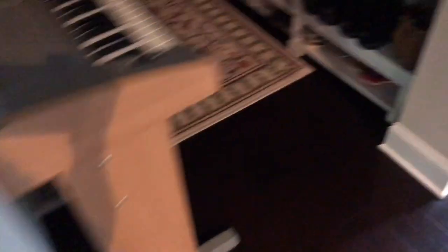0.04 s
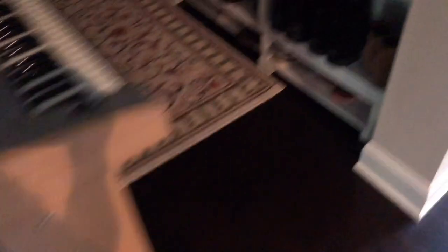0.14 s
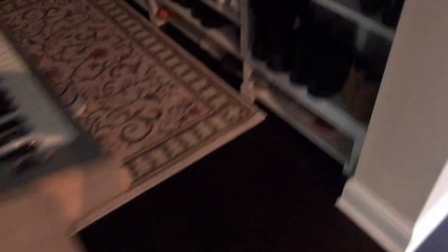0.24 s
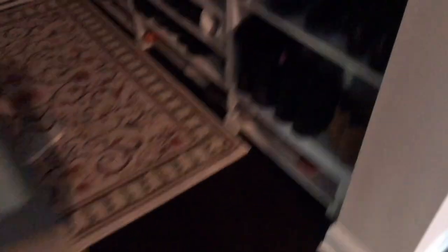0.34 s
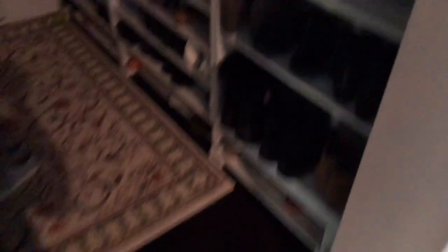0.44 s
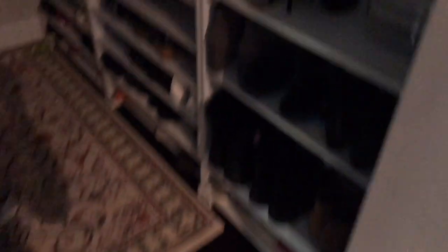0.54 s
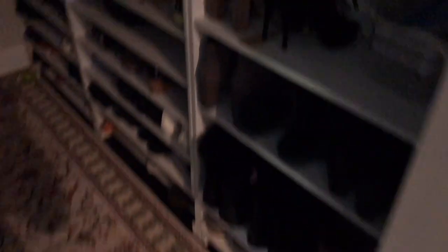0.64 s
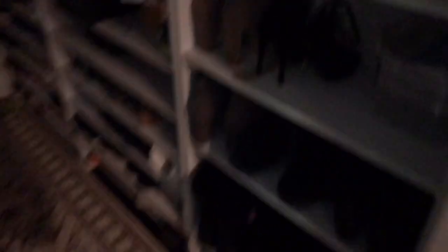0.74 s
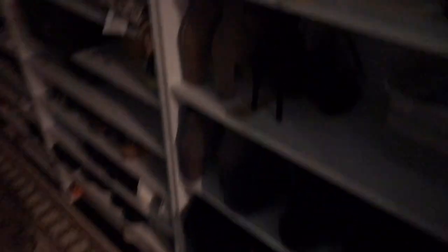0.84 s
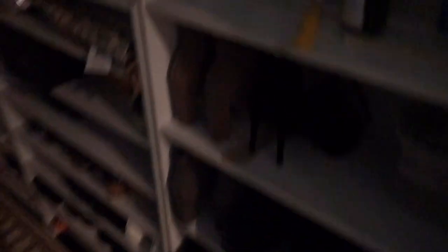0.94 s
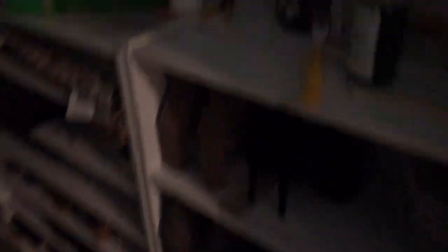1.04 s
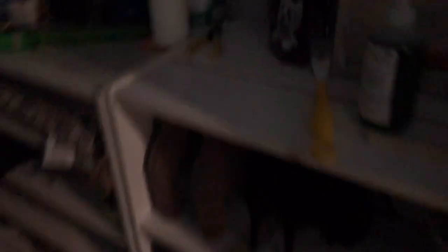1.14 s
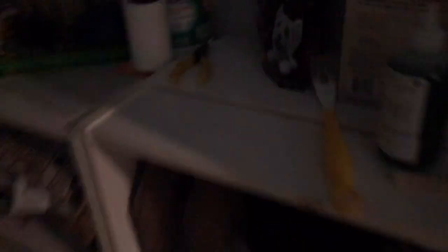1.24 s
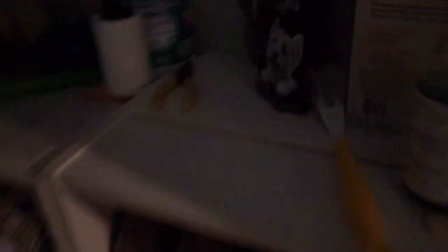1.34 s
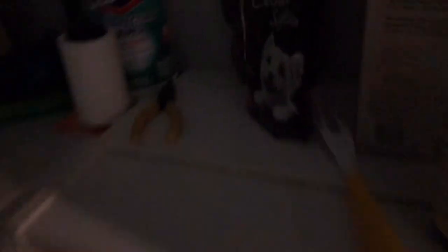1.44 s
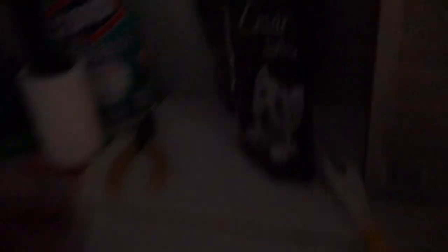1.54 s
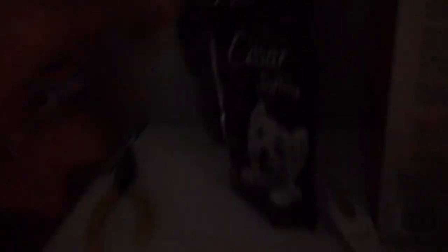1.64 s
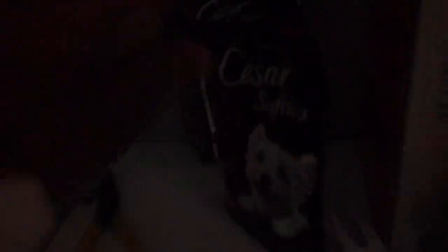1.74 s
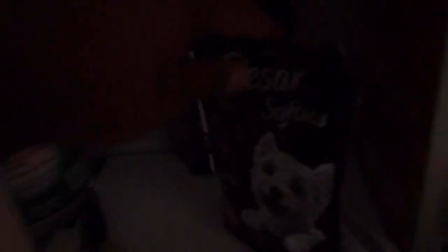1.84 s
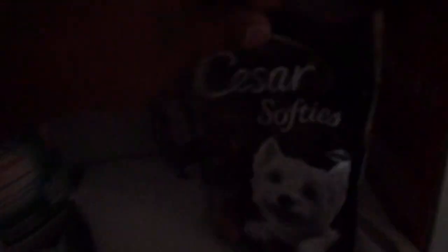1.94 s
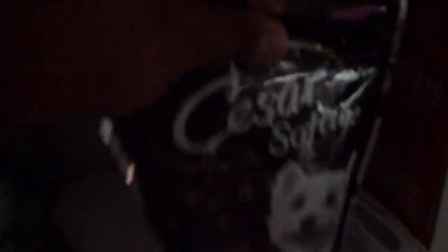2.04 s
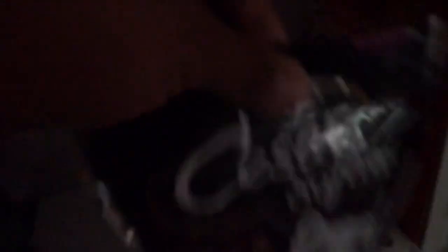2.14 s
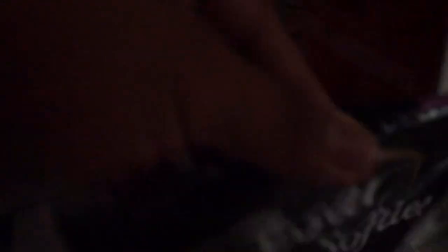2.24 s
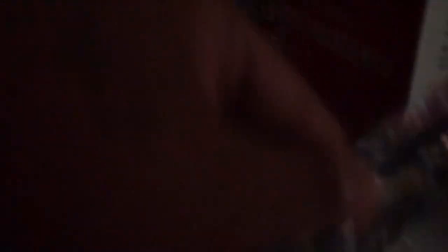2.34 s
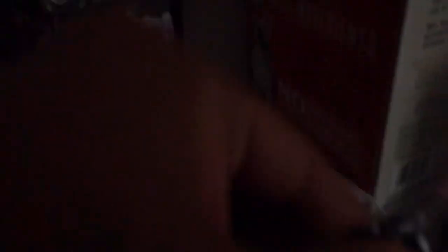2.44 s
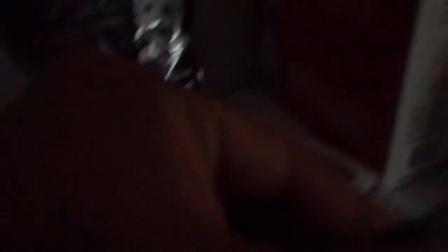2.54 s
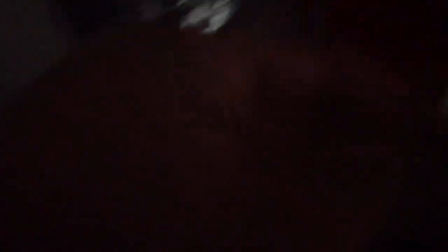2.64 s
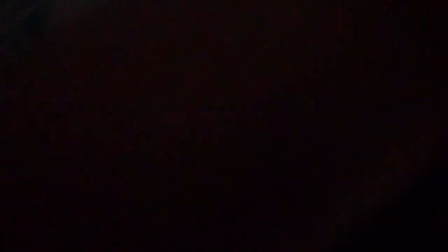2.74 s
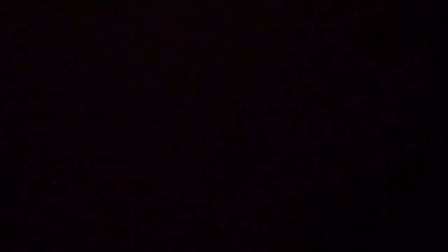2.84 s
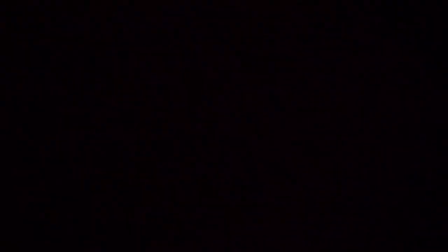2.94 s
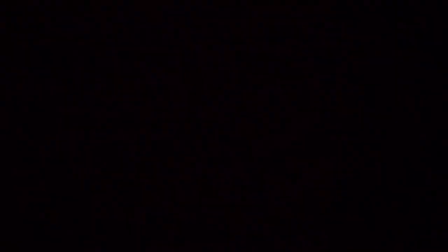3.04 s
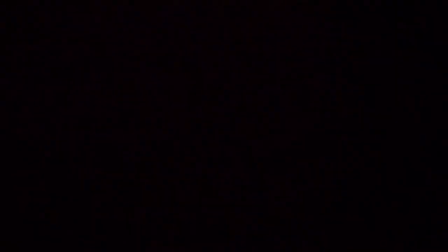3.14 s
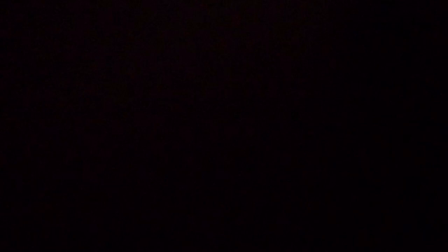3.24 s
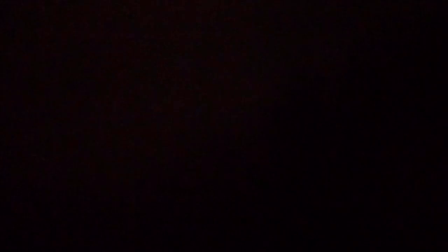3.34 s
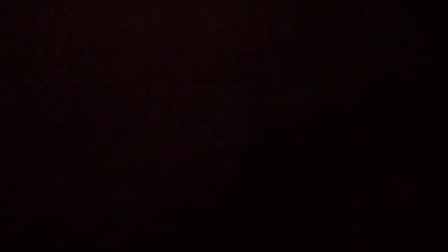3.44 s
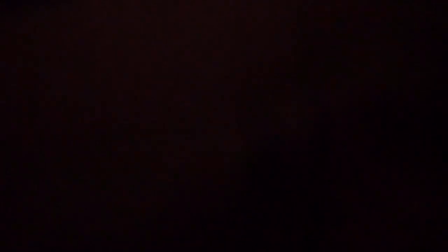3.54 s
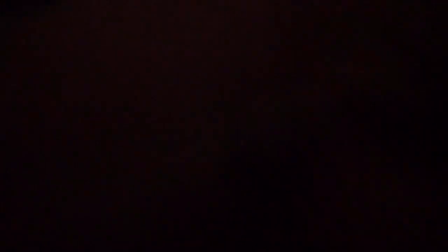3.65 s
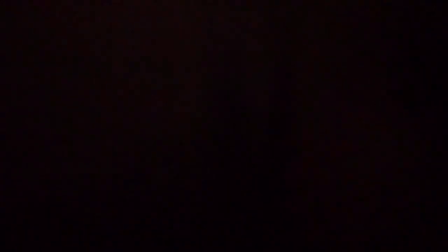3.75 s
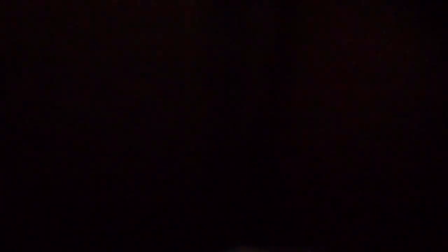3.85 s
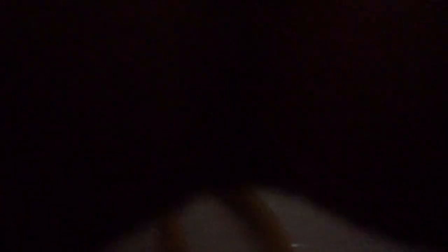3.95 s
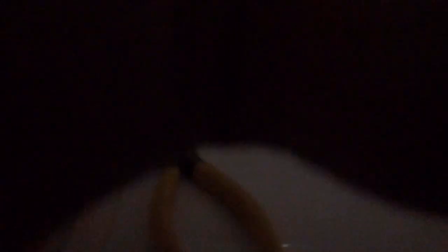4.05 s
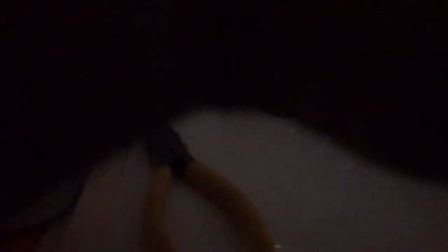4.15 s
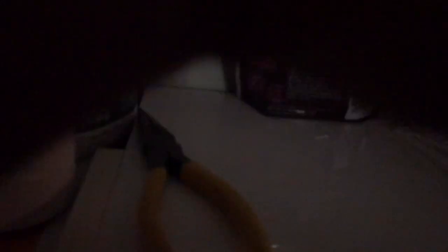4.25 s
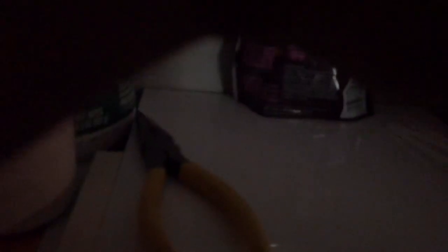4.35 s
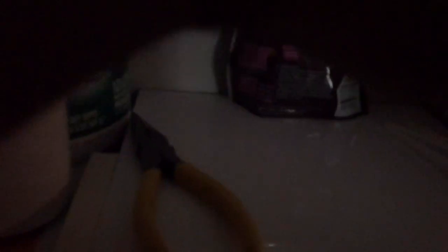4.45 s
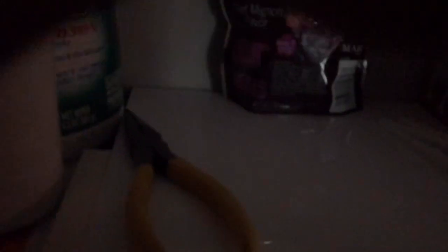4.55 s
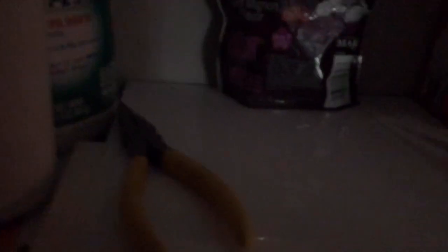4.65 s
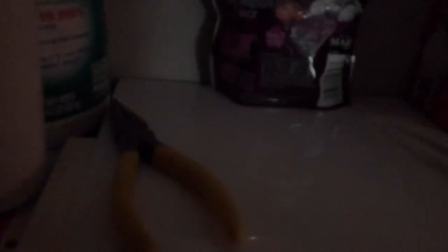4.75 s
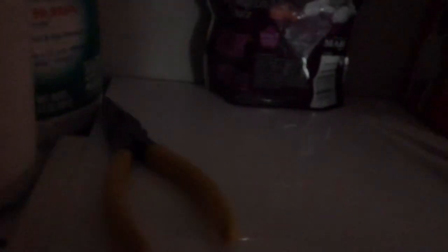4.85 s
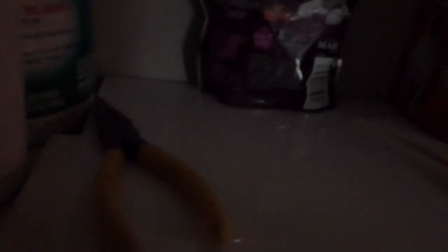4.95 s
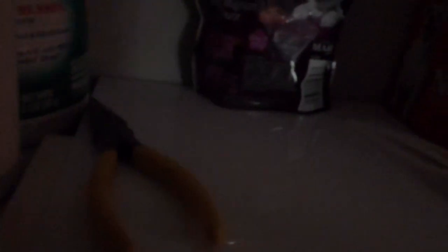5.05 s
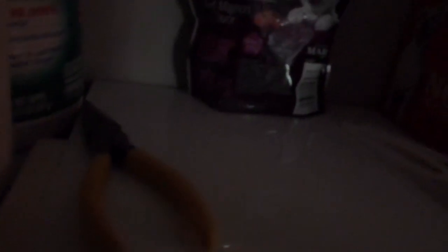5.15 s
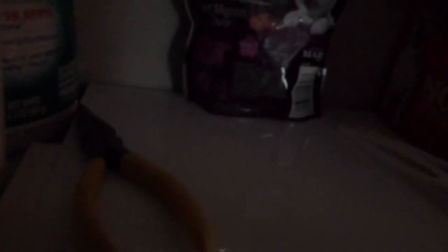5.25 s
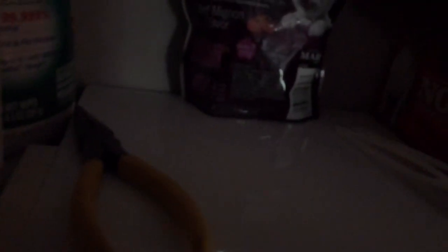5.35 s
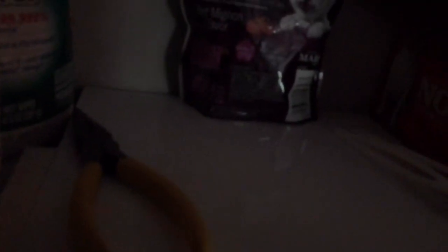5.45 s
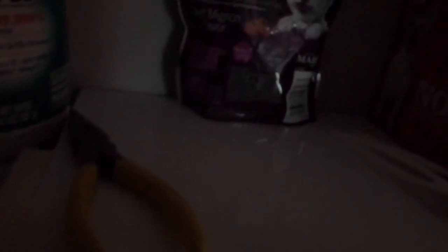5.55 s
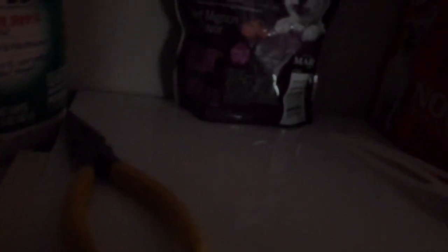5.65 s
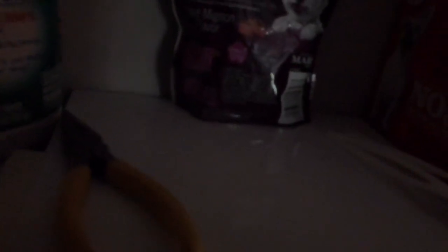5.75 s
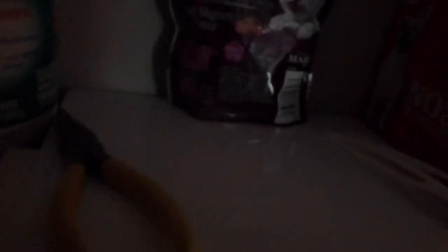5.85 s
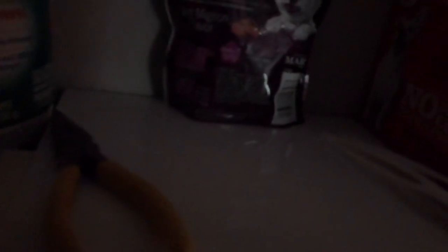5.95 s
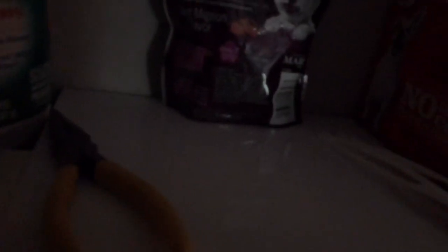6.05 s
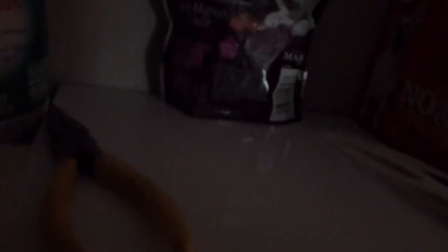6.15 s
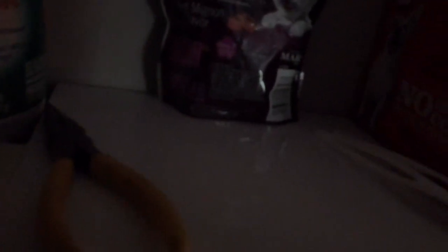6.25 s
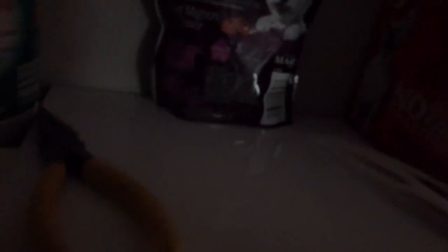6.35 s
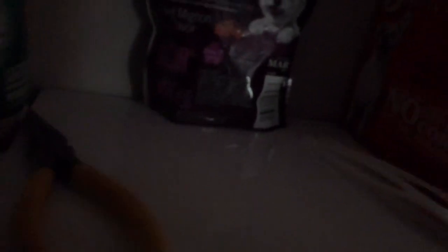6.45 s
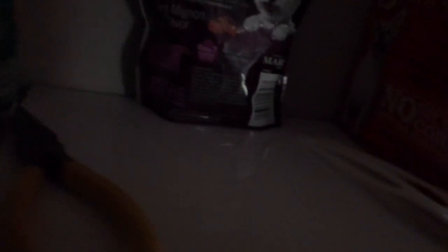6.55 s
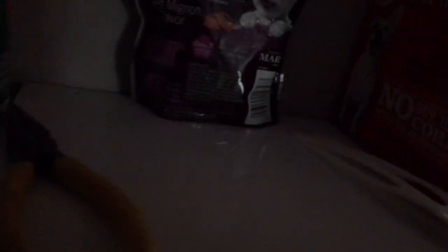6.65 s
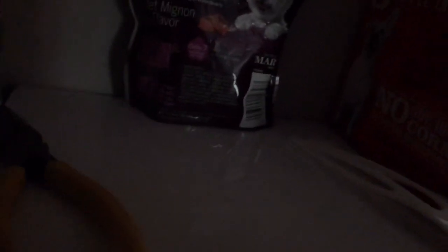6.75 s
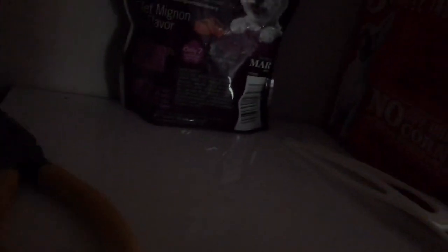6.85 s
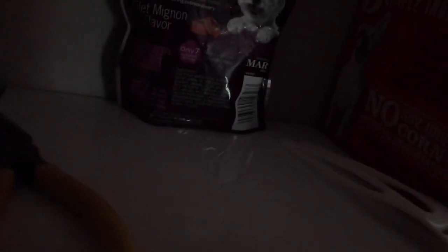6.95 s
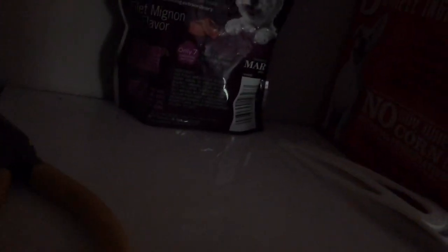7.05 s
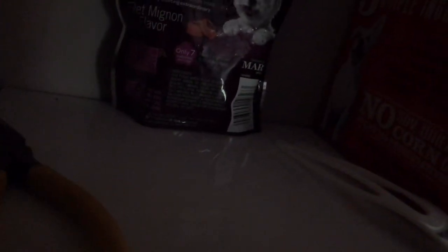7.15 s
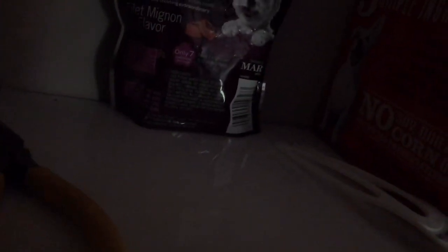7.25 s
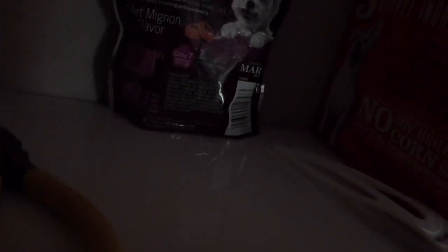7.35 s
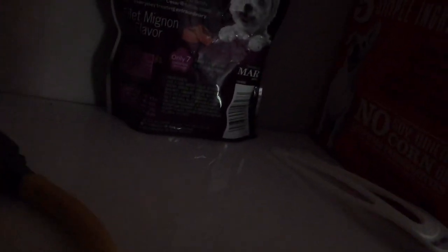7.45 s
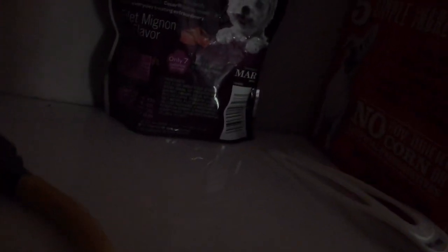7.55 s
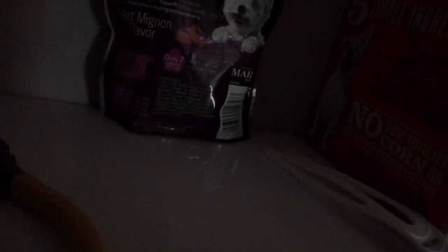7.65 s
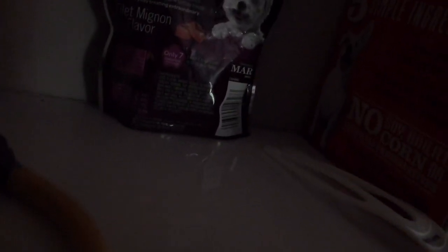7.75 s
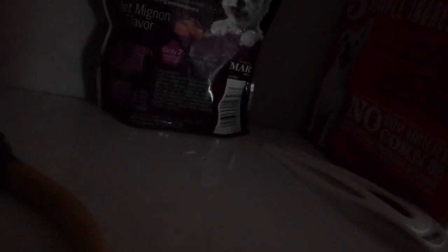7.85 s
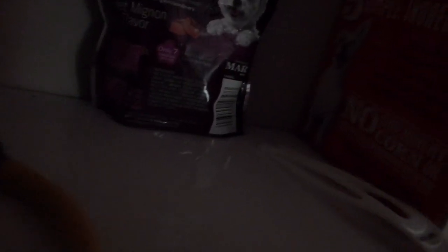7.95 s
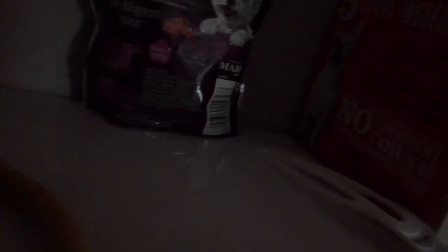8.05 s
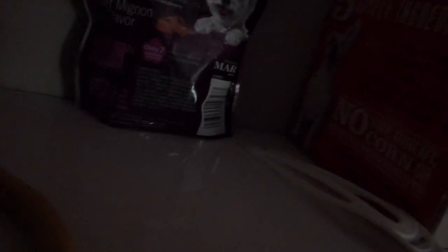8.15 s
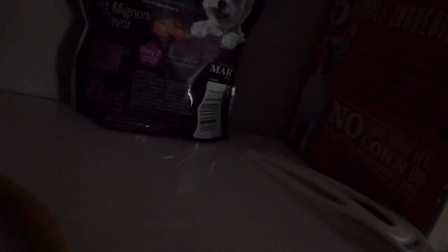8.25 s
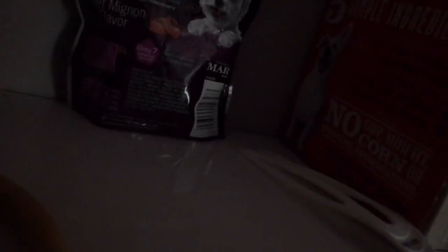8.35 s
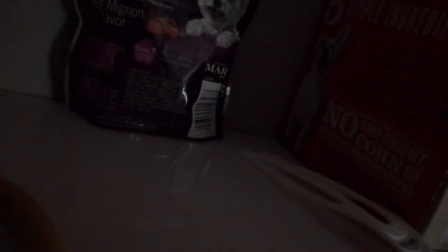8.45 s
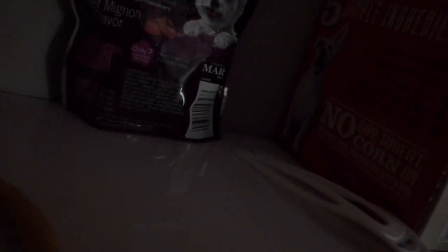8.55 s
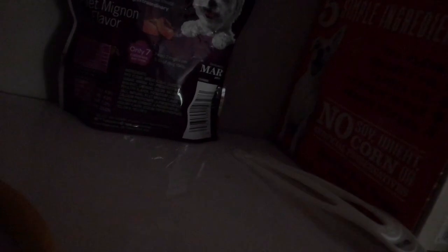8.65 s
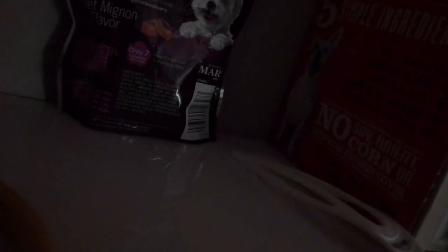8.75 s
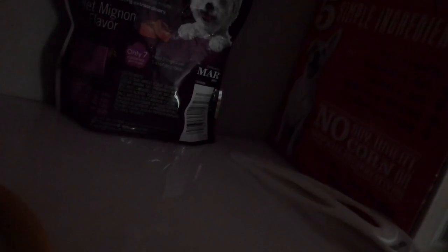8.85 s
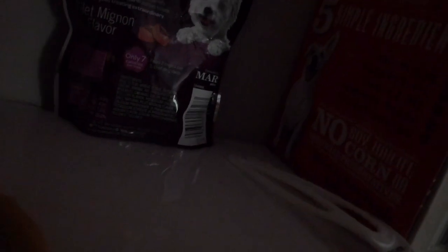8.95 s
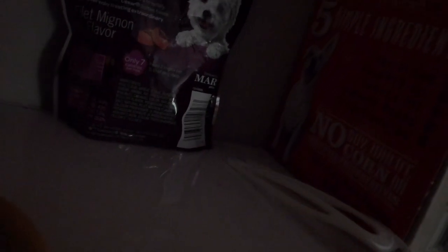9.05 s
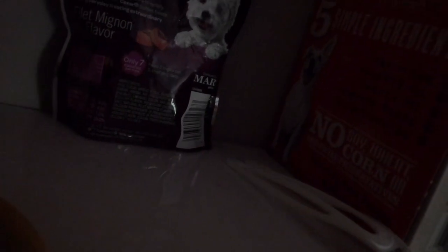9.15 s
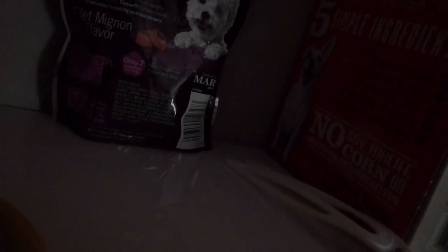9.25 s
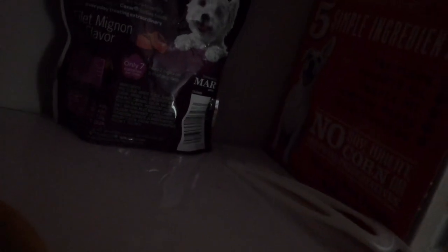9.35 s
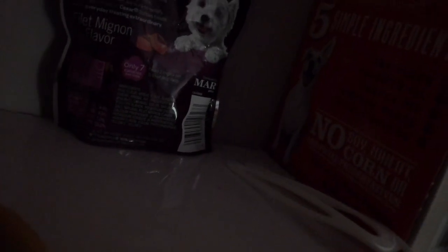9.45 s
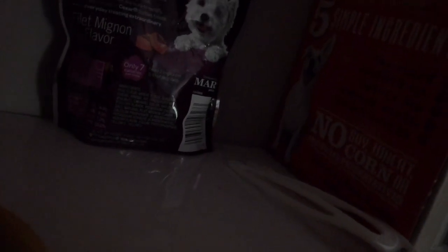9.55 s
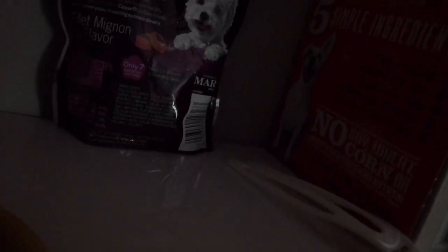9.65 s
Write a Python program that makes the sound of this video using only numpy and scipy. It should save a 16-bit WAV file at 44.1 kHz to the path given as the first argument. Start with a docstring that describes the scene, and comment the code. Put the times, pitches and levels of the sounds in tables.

```python
"""A faint hum and hiss come first, then a clatter far off in a large hard room, built from decaying noise.
Close by, a hand rummages in a stiff plastic pouch on a pantry shelf: creases snap one by one over a finer rustle.
Each snap is a bending wave in the film, made of noise bands: treble comes early and dies at once, bass rings on.
Hollow knocks are decaying sines; rubs and whistles are noise around one pitch; the shelf adds a short echo."""
import sys
import numpy as np
from scipy import signal
from scipy.fft import rfft, irfft, next_fast_len
from scipy.io import wavfile
from scipy.ndimage import uniform_filter1d, map_coordinates

SR = 44100
rng = np.random.default_rng(int(sys.argv[2]) if len(sys.argv) > 2 else 0)


def store_pcm(level_fs):
    """Save levels as 16-bit WAV."""
    pcm = np.round(np.clip(level_fs, -1, 1) * 32767).astype(np.int16)
    wavfile.write(sys.argv[1], SR, np.atleast_2d(pcm).T)


def makeup_ratio(level_db):
    """Linear amplitude ratio for a level in decibels (20 dB per factor of ten)."""
    decades = np.asarray(level_db, float) / 20
    return 10 ** decades


N = 427769


def along(points, hz):
    """Spectral interpolation: (f/Hz, value) points joined on a logarithmic frequency axis."""
    f, v = np.transpose(points)
    return np.interp(np.log(hz + 1), np.log(f + 1), v)


def weights(knots_hz, hz):
    """Linear superposition: the share of each knot frequency in the level at hz."""
    return np.array([along(np.c_[knots_hz, row], hz) for row in np.eye(len(knots_hz))])


def filtered(x, response):
    """Linear filtering: the spectrum of x times a response of frequency."""
    m = next_fast_len(N + 8192)
    return irfft(rfft(x, m) * response(np.fft.rfftfreq(m, 1 / SR)), m)[..., :N]


def unit(x):
    """Normalisation to an rms of 1."""
    return x / np.sqrt(np.mean(x ** 2) + 1e-20)


def wobble(rate_hz, order=1):
    """Slow random modulation: Gaussian values, rate_hz of them a second, joined by interpolation."""
    values = rng.standard_normal(int(N * rate_hz / SR) + 4)
    return map_coordinates(values, [np.arange(N) / SR * rate_hz], order=order)


def tail(decay, seconds):
    """Diffuse reverberation: noise of energy 1 in which each frequency decays with its own t60."""
    hz, t, z = signal.stft(rng.standard_normal(int(seconds * SR)), SR, nperseg=256)
    answer = signal.istft(z * makeup_ratio(-60 * t / along(decay, hz)[:, None]), SR, nperseg=256)[1]
    return answer / np.linalg.norm(answer)


def vibration(hz, octaves, evenness):
    """Narrow-band random vibration of the film, its beating partly evened out."""
    def band_shape(f):
        return np.cos(np.clip(np.log2((f + 1) / hz) / octaves, -1, 1) * np.pi / 2)
    band = filtered(rng.standard_normal(N), band_shape)
    swing = np.sqrt(np.abs(uniform_filter1d(band ** 2, size=int(2 * SR / hz) + 1)) + 1e-12)
    return unit(band / swing ** evenness)


# spectrum of the background, relative: f/Hz, level per Hz/dB
FLOOR_COLOUR = [(15, -45.5), (33, -18.5), (50, 1.5), (66, -3.5), (105, -8.5), (911, -24), (1400, -25.5),
                (2110, -25), (8000, -32), (11500, -38), (16000, -40.5)]
FLOOR_DB = -62.5  # rms


def floor():
    """Stationary coloured noise: steady hum of the house and hiss of the microphone."""
    return makeup_ratio(FLOOR_DB) * unit(filtered(rng.standard_normal(N), lambda hz: makeup_ratio(along(FLOOR_COLOUR, hz))))


HUM_HZ, HUM_DB, HUM_FADES_S = 53, -60.5, 1.8  # level at the start; halved in amplitude at HUM_FADES_S


def hum():
    """Frequency modulation: a low tone wavers slightly and fades away."""
    t = np.arange(N) / SR
    phase = 2 * np.pi * np.cumsum(HUM_HZ + wobble(5, order=3)) / SR
    return makeup_ratio(HUM_DB) / (1 + (t / HUM_FADES_S) ** 4) * np.sin(phase)


# far blows: t/s, energy level before colouring/dB, near walls relative to the hall/dB
BLOWS = [(0.081, -3, 11), (.088, 12.5, -3.5), (.118, 8, -4.5), (.222, 5.5, -20)]
# spectrum of the clatter: f/Hz, level per Hz/dB
CLATTER_COLOUR = [(24, -41.5), (40, -27), (66, 11.5), (104, -12.5), (163, -1), (422, -3.5), (570, 2),
                  (852, -8.5), (1370, -6.5), (2000, -9), (2260, -9.5), (6000, -13), (8000, -8),
                  (9400, -12.5), (10800, -8.5), (13000, -13.5), (16000, -16.5)]
# reverberation of the large hard room: f/Hz, t60/s
HALL = [(70, 1.4), (500, 1.05), (1400, 1.33), (4000, 1.17), (9000, 0.75), (15000, 0.39)]


def clatter():
    """Impulse response of a room: each far blow is a short bright burst off near walls, then reverberation."""
    out = np.zeros(N)
    for s, db, near_db in BLOWS:
        near_walls = tail([(300, 0.011), (9000, 0.16)], seconds=1.5)
        answer = tail(HALL, seconds=1.5) + makeup_ratio(near_db) * near_walls
        answer *= 1 - np.exp(-np.arange(len(answer)) / SR / 0.0017)  # builds up in a few ms
        out[int(s * SR):][:len(answer)] += makeup_ratio(db) * answer

    def colour(hz):
        resonance = 1 + 1 / (1 + ((hz - 1370) / 70) ** 2)  # of the struck thing
        return makeup_ratio(along(CLATTER_COLOUR, hz)) * resonance
    return filtered(out, colour)


FALL_SLOWER, POINTED = 1.23, 1.55  # fall time over rise time; how a swell narrows to its peak


def swells(t, s, half_s, db):
    """Transient envelopes: power of movements that swell to a peak and die away, one row each."""
    u = (t - s[:, None]) / half_s[:, None]
    u = np.where(u > 0, u / FALL_SLOWER, -u)
    return makeup_ratio(2 * (db[:, None] - 8.03 * u ** POINTED))


# strokes of film and cloth sliding under the hand: peak t/s, half length/s, level/dB, treble relative/dB
STROKES = [(0.689,0.046,-70,10.5),(0.853,0.076,-57.5,1),(1.433,0.19,-58,0.5),(1.878,0.01,-45,9),(1.937,0.023,-29.5,-10),
           (2.023,0.092,-38.5,-3),(2.213,0.079,-41,-4),(2.358,0.023,-37.5,-2),(2.438,0.1,-41.5,-6),(2.55,0.12,-46,-19),(2.734,0.064,-31.5,-12),
           (2.852,0.01,-19.5,-4),(2.893,0.039,-27,-3),(2.934,0.018,-22,-11),(3.039,0.023,-21.5,-8),(3.16,0.037,-37.5,-16),(3.349,0.051,-35,-9),(3.431,0.082,-44.5,-5.5),(3.609,0.015,-41.5,0),
           (3.698,0.063,-42,-5.5),(3.925,0.042,-49,-9),(4.059,0.036,-41.5,-7),(4.49,0.14,-51,-4.5),(4.56,0.014,-47,-5),(4.605,0.0212,-43.5,-14),
           (4.763,0.014,-49,-5),(5.305,0.035,-46,-15),(5.606,0.032,-52.5,-12),
           (5.936,0.023,-57,-6),(6.18,0.058,-50,-2),(6.369,0.031,-43,-3.5),(6.565,0.071,-56,-2),(6.81,0.076,-59,-9),
           (7.466,0.032,-47.5,-5),(7.58,0.016,-44,-9),(7.78,0.05,-51.5,-5),(7.83,0.025,-50.5,-2),
           (7.9,.025,-50,-22),(7.934,0.053,-57.5,-2.5),(8.148,0.059,-55,1.5),(8.361,0.026,-53,-1),
           (8.984,0.042,-54,-7),(9.379,0.018,-47.5,-7),(9.455,0.019,-51.5,-3.5),(9.7,0.067,-46,-11)]
# the contents shift with a low rumble: peak t/s, half length/s, level/dB
SHIFTS = [(2.055,0.075,-36),(2.145,0.078,-38),(2.56,0.23,-39),(2.73,0.11,-36.5),(3,0.0305,-29),
          (3.089,0.057,-36),(3.23,0.023,-41),(3.372,0.079,-43),(3.754,0.059,-48),(3.87,0.067,-52),(4.016,0.029,-47.5),(4.178,0.027,-44),(4.3,0.063,-44),
          (4.57,0.091,-49),(4.883,0.076,-50.5),(5.18,0.096,-50.5),(5.309,0.1,-50.5),(5.626,0.12,-50),(5.78,0.15,-45.5),
          (5.883,0.08,-53),(6.16,0.046,-39),(6.4,0.28,-51.5),(6.576,0.045,-55),(6.807,0.063,-50),(6.957,0.013,-42),(6.04,0.023,-50.5),(7.092,0.0325,-53),
          (7.331,0.05,-51.5),(7.602,0.045,-45),(7.784,0.072,-47),(7.915,0.1,-44.5),(8.139,0.016,-31),(8.203,0.045,-43),(8.361,0.087,-49.5),(8.508,0.136,-57),
          (8.659,0.021,-40),(8.8,0.16,-51.5),(9.181,0.042,-52),(9.335,0.12,-49.5),(9.476,0.016,-41),(9.7,0.098,-44.5)]
# where the rustle's levels are set: f/Hz
RUSTLE_HZ = [350, 1000, 3000, 10500]
# the hand never lies quite still: level/dB at each RUSTLE_HZ
RESTING_DB = [-66.5, -75, -73.5, -76]
# colour of a stroke, relative level/dB at each RUSTLE_HZ but the treble
STROKE_COLOUR_DB = [-24.5, -0.5, -0.5]
# colour of a shift, relative level/dB at each RUSTLE_HZ
SHIFT_COLOUR_DB = [-2, -5.5, -16, -29.5]
RUSTLE_FROM_S = 0.53


def rustle():
    """Addition of powers: times, and level/dB at RUSTLE_HZ, of strokes and shifts over the resting hand."""
    t = RUSTLE_FROM_S + np.arange(int(N / SR * 200)) / 200  # 200 levels a second
    *stroke, treble_db = np.transpose(STROKES)
    colour_db = np.array([db + 0 * treble_db for db in STROKE_COLOUR_DB] + [treble_db])
    stroking = makeup_ratio(2 * colour_db) @ swells(t, *stroke)
    shifting = swells(t, *np.transpose(SHIFTS)).sum(axis=0)
    power = stroking + np.outer(makeup_ratio(2 * np.array(SHIFT_COLOUR_DB)), shifting)
    return t, 10 * np.log10(power + makeup_ratio(2 * np.array(RESTING_DB))[:, None])


# the contents shift and bump, most of all around 800 Hz: f/Hz, unevenness/dB
LUMPS = [(250, 0.5), (800, 6.5), (2500, -3)]
PATCHY_DB = 2  # once the pouch is gripped, each band of the rustle swells on its own


def sliding_gain(hz, rustle_s, rustle_db, flutter, smooth_db=-3.5, flutter_db=1.5):
    """Amplitude modulation of friction noise: the sliding of one band flutters, swells and bumps."""
    t = np.arange(N) / SR
    patches = PATCHY_DB * (t > SNAPS[0][0]) * np.tanh(wobble(6.4) / 1.7) * 1.7
    bumps = along(LUMPS, hz) * np.clip(wobble(22), -3, 1.6)
    db = np.interp(t, rustle_s, rustle_db) + smooth_db + flutter_db * flutter + patches + bumps
    return np.clip((t - rustle_s[0]) / 0.1, 0, 1) * makeup_ratio(db)


FOLDS_DB = 3  # how far the narrow bands stand out


def folds(x):
    """Local resonance: the folds under the hand ring in narrow bands that hold for a moment, then change."""
    z = signal.stft(x, nperseg=256)[2]
    across_bands = uniform_filter1d(rng.standard_normal(z.shape), size=2, axis=0)
    field = uniform_filter1d(across_bands, size=24, axis=1)
    gripped = np.arange(z.shape[1]) * 128 / SR > SNAPS[0][0]
    gain = makeup_ratio(FOLDS_DB * gripped * unit(field))
    return signal.istft(z * gain / np.sqrt(np.mean(gain ** 2)), nperseg=256)[1][:N]


# creases that snap: t/s, level near 4.5 kHz/dB, then relative to it body near 1.4 kHz/dB and
# edge near 11.5 kHz/dB, time the crease takes to run through/ms
SNAPS = [(1.85,-28.5,-11,-0.5,3.5),(1.873,-33,-7,2,1.5),(1.881,-41.5,-15,8,1.7),(1.9024,-24,1,-4.5,2),(1.913,-16,-25,10,0.84),
         (1.9191,-35.5,9.5,-6,2.33),(1.932,-33.5,7,-10.5,6.1),(1.953,-23,-2,-14,3.1),(1.958,-27,-3.5,2,7.1),(1.9935,-16.5,-5,-0.5,1.2),
         (2.0197,-33.5,-9,9.5,1),(2.029,-32.5,-1,15,3),(2.0439,-20.5,-7.5,-6,4.7),(2.067,-30,-1,-4,5.6),(2.077,-30.5,6.5,-4,3),
         (2.089,-32,3,2,5.1),(2.1205,-22,-16,-7,.9),(2.178,-20.5,0.5,-6,1.7),(2.229,-30,-8,3.5,1),(2.235,-18.5,0.5,4,1.1),(2.318,-33,-5,0.5,5.1),
         (2.3383,-7,-10.5,-4.5,0.6),(2.355,-18.5,-12,-5.5,0.84),(2.365,-14,-8,-2.5,1.05),(2.4145,-31,8.5,-5,4.7),(2.4234,-23,-13,-10.5,3.1),
         (2.438,-24.5,2,-18.5,1.5),(2.4621,-22.5,1.5,-15,2.3),(2.487,-40,-15,9,1),(2.503,-41,-12,8,1),(2.5164,-20.5,-6.5,-12.5,4.3),(2.543,-40,-14.5,4,1),(2.571,-25,1,-8.5,3.9),(2.581,-41.5,-10.5,11.5,1.5),(2.5949,-20.5,-4,-16,0.45),
         (2.612,-30.5,-1,8,1),(2.6332,-27.5,-4,5.5,4.1),(2.6743,-21.5,1,-15,2.7),(2.6848,-4.5,-6,-12,0.94),(2.7287,-12,-6.5,-3.5,1),
         (2.731,-17,-17,-1.5,4.7),(2.748,-30.5,-6,-6.5,3.8),(2.7553,-29.5,6.5,-2,5),(2.771,-40,15,-1.5,3),(2.8061,-11,-12.5,-3,5.5),
         (2.851,-18.5,2,-4,6),(2.95,-24,7.5,-12.5,7.7),(2.9963,-20.5,0,-13,1.8),(3.0241,0,-9.5,-15.5,0.7),
         (3.035,-16,-16,-10.5,2),(3.043,-13.5,-14,-22,3.3),(3.049,-6.5,-15,-21.5,1.7),(3.061,-20.5,-11,-9,2.5),(3.066,-16,7.5,-12,1.32),
         (3.083,-28.5,-4,0,2),(3.1096,-2.5,-5,-16.5,1.1),(3.1179,-13.5,-0.5,-1.5,1.6),(3.1824,-37,7.5,-31,2.7),(3.2235,-39,15,-46,2.9),(3.3272,-39.5,-15,-8.5,4),
         (3.4003,-43,2,-10.5,.5),(3.422,-40,-2,-3.5,0.92),(3.4668,-11,-10,6,.5),(3.445,-35,3,-10.5,2),(3.5072,-24,-6,-10,1.3),(3.6058,-41,1.5,6.5,13),
         (3.618,-18.5,-10,2.5,1.05),(3.696,-41,4,-5,4.2),(3.714,-28,9.5,-18,3.3),(3.7469,-39,14,-13,.5),(3.8067,-33,-5,-9,1.7),
         (3.857,-35,-15,-39,1),(3.8969,-26,-9,-16,0.33),(3.932,-32,-5,-9,1),(3.944,-20,-15,6,1.3),(3.968,-38.5,-4,-3,0.98),
         (4.0321,-25.5,-16,-3.5,1.8),(4.0702,-41.5,-12,4,2.2),(4.082,-28,-10,-18.5,1.6),(4.0935,-31,-38,-1,2.4),(4.165,-66,36,-9,.5),
         (4.195,-42,-15,2,1.5),(4.2089,-37,-14.5,2.5,.8),(4.333,-43,-8,2,1.25),(4.3481,-21.5,-7.5,-26.5,1.18),(4.392,-36,-15,-4,0.71),(4.432,-27.5,-3,8.5,.5),
         (4.446,-33.5,-1,2.5,1.3),(4.451,-33,5,-5,3),(4.4589,-12,-50,-7,.5),(4.4674,-20,-5.5,-5,1.2),(4.51,-36,-40,1,2.9),
         (4.5273,-35,-24,2,2.5),(4.5963,-43,-2,11,2.3),(4.626,-46.5,-2,-7.5,2),(4.706,-41.5,-2,-2,1),(4.753,-42,-32,-6.5,1.7),(4.772,-42.5,-30,3,2),
         (4.795,-57,-20,6.5,2),(4.8307,-15.5,-6,-8.5,1.5),(4.941,-54,-21,8.5,1.9),(5.0378,-37.5,-3,2,1.1),(5.054,-44.5,-13,3,3),(5.1374,-52,-16,-2,1.5),(5.234,-60,-15,12,2),(5.251,-18,-8,-15,2.3),(5.2598,-44,5,-10,2.8),
         (5.303,-40,2.5,-19,3.8),(5.401,-50,0,12,1.7),(5.4297,-35.5,0.5,-0.5,1.3),(5.469,-43.5,-9,-25,1.3),(5.4886,-39.5,12,-21,0.56),
         (5.546,-47,-19,13.5,.4),(5.649,-52.5,6,11,1.1),(5.683,-49,-10,3.5,2.7),(5.707,-56,-15,5,1.3),(5.7148,-18.5,-2,-8.5,3.4),(5.737,-7.5,0.5,1.5,0.6),(5.754,-49,11,1,5.5),
         (5.7816,-42.5,28.5,-14.5,0.6),(5.7857,-29,-5,1,1.2),(5.829,-23,6,-15.5,1.16),(5.979,-47.5,-22,-9.5,3.7),(6.073,-51,-15,4,1.1),(6.0947,-49.5,-5,17,1.3),
         (6.112,-29,5.5,-30,4.2),(6.115,-30,4,-6.5,5),(6.1312,-23.5,-8,-1,3.2),(6.2268,-44,-3,4,7.5),(6.2364,-43,-10,3,2.3),(6.3045,-33.5,-10,7,1.3),
         (6.325,-49,-18,17.5,1.6),(6.352,-42,2.5,-0.5,4.6),(6.3752,-34,0.5,-2.5,3.5),(6.4,-50,-10,6,2),(6.4499,-34,-8,1,2.2),(6.5207,-36.5,-13,7,2),
         (6.584,-48,1,3,14.4),(6.674,-55,-7,8,1.5),(6.707,-39.5,-9,-9,1.5),(6.7427,-39.5,-4,-4,1),(6.859,-37,-23,-7,1.9),(6.9503,-23.5,-13,-6.5,0.36),
         (7.297,-31.5,-19.5,-0.5,1.96),(7.3235,-27.5,-29.5,-10.5,1.1),(7.3436,-42,-1.5,0,3.5),(7.3687,-47,-6,-1,2),(7.3974,-40.5,-1,8,1.5),(7.453,-52,-4.5,3,2.5),(7.4869,-39.5,-8,2,2.7),
         (7.528,-43.5,-18,4,1.7),(7.567,-45.5,-9,10,2.8),(7.697,-44,8,-35,1.5),(7.735,-32.5,-10,4,2.5),(7.7918,-34,-7,7,2.2),
         (7.8592,-39.5,18.5,-17,6.7),(7.879,-47,26.5,-16,2),(7.8864,-37.5,14,-10.5,2.6),(7.913,-38,-15,-3.5,3.4),(7.9802,-44.5,-4,15.5,0.98),
         (8.083,-34.5,-6.5,9,2.4),(8.126,-29,-13,-6.5,3.8),(8.1533,-41,-10,0.5,1.5),(8.2047,-33,-1,2.5,1.8),(8.312,-46,-10,-1,3.4),
         (8.3204,-21.5,-9.5,-4,2.3),(8.332,-38,-17,-9,10.6),(8.375,-32,-11,-27,0.95),(8.6224,-49.5,-6,-6,1.9),(8.666,-40,-4,0,3.5),(8.676,-45.5,-20,0,2.5),
         (8.792,-17.5,-9.5,0.5,1.04),(8.9018,-36,-20.5,-4,1.9),(8.952,-31,-17.5,-4,1.8),(8.976,-32.5,-12,-15,4.2),(9.149,-46,-10,-2.5,2.6),
         (9.185,-49.5,-9,3,1.3),(9.3138,-46,19,-36,2.4),(9.3537,-33,-2,0,8.4),(9.4499,-58,23,-12,2.5),(9.526,-40.5,0,-1,2.2),
         (9.5642,-53.5,-2,-3,1.5),(9.581,-40,-5,6,2.3),(9.6048,-44.5,5,-14,5.6),(9.6127,-31.5,-20.5,0,1.2),(9.678,-46,-1.5,-15,3.3)]
# where a snap's levels are set: f/Hz
SNAP_HZ = [350, 1400, 4500, 11500]
# the whole pouch thumps with a snap: dB relative to it, more for a full body, growing slower than the snap
THUMP_DB, THUMP_PER_BODY, THUMP_LAG, MIDDLING_SNAP_DB = -10.5, 0.97, 0.21, -31


def snap_levels():
    """Spectral balance of buckling: each snap's level/dB at SNAP_HZ, from thump to edge."""
    _, snap_db, mid_db, top_db, _ = np.transpose(SNAPS)
    thump_db = THUMP_DB + THUMP_PER_BODY * mid_db - THUMP_LAG * (snap_db - MIDDLING_SNAP_DB)
    return snap_db + np.array([thump_db, mid_db, 0 * snap_db, top_db])


def slips(count=6):
    """Progressive buckling: a crease gives way in several slips over the time it takes to run through."""
    snap_s, *_, run_ms = np.transpose(SNAPS)[:, :, None]
    part = (np.arange(count) + rng.random((len(snap_s), count))) / count
    slip_s = snap_s + run_ms / 1000 * part
    slowness = 1 + run_ms / 2
    fading_db = 4 * np.arange(count) / slowness ** 2  # a quick crease spends itself at once
    return slip_s, -4.5 - fading_db + 0.67 * rng.standard_normal(slip_s.shape) + 10 * np.log10(slowness)


# the crease first breaks with one sharp crack: delay, level against the snap, cycles to fall 60 dB, low corner
CRACK_MS, CRACK_DB, CRACK_CYCLES, CRACK_FROM_HZ = 1.05, 1, 3, 1800


def cracks():
    """Impulsive fracture: sample, sign and relative level/dB of each crack; slow creases crack less."""
    snap_s, *_, run_ms = np.transpose(SNAPS)
    sign = np.sign(rng.standard_normal(len(snap_s)))
    db = CRACK_DB - 20 * np.log10(1 + run_ms / 4) + 2.5 * rng.standard_normal(len(snap_s))
    return ((snap_s + CRACK_MS / 1000) * SR).astype(int), sign, db


def crack_ring(hz):
    """Damped oscillation: the few cycles a crack rings in one band."""
    turns = hz * np.arange(256) / SR
    return np.sin(2 * np.pi * turns) * makeup_ratio(-60 * turns / CRACK_CYCLES) / (1 + (CRACK_FROM_HZ / hz) ** 4)


TICK_SHARE = 0.069  # of all crinkles: those of the film settling by itself


def crinkles(per_s=260, spread_db=5.0):
    """Poisson process: times, chance sizes/dB and which settle by themselves; many small, few large."""
    chance = rng.random((4000, 3))
    s = np.cumsum(-np.log(1 - chance[:, 0])) / per_s + SNAPS[0][0]
    return s, -spread_db * np.log(1 - .95 * chance[:, 1]), chance[:, 2] < TICK_SHARE


# crinkles of the film settling by itself, lowest level before their chance size: f/Hz, level/dB
TICK_COLOUR = [(1500, -76), (4500, -57.5), (11500, -57.5)]


def crinkle_levels(hz, s, size_db, settling, rustle_s, rustle_db, crinkle_db=-5.0):
    """Crackling noise: crinkles follow the rustle, but those that settle by themselves keep a least level."""
    db = np.interp(s, rustle_s, rustle_db) + crinkle_db
    return np.where(settling, np.maximum(db, along(TICK_COLOUR, hz)), db) + size_db


# how the film answers a snap: f/Hz, arrival/ms, rise/ms, t60/ms, colour/dB
FILM = [(75, 9.5, 4.4, 130, -36.5), (163, 8.3, 1.2, 42, -20.5), (271, 1.6, 1, 52, -17.5),
        (485, 2, 0.8, 59, -18), (920, 2.7, 0.19, 21, -19.5), (1680, 1.33, 0.2, 15.2, -15.5),
        (4310, 1.15, 0.13, 9.3, -13), (8300, 1.05, 0.042, 11.7, -12.5), (14400, 1.05, 0.018, 5.4, -15.5)]


def film_answer(hz):
    """Dispersion of bending waves: power envelope after a kick, peak 1, and colour/dB of one band."""
    film, ms = np.array(FILM), np.arange(SR // 8) * 1000 / SR
    arrival, rise, t60, colour_db = (along(film[:, [0, k]], hz) for k in range(1, 5))
    age = np.maximum(ms - arrival, 0)
    shape = (1 - np.exp(-age / rise)) ** 2 * makeup_ratio(-60 * age / t60)
    return (shape / shape.max()) ** 2, colour_db


def pouch(colour_scatter_db=2.5):
    """Forced vibration: snaps and crinkles shake the film band by band, over the sliding rustle."""
    levels, (slip_s, slip_db) = snap_levels(), slips()
    crack_at, crack_sign, crack_db = cracks()
    crinkle_s, size_db, settling = crinkles()
    rustle_s, rustle_levels = rustle()
    kick_at = np.minimum(np.r_[slip_s.ravel(), crinkle_s] * SR, N).astype(int)
    flutter = wobble(99)
    out, sliding = np.zeros(N), np.zeros(N)
    for hz in np.geomspace(75, 15000, num=26):
        envelope, colour_db = film_answer(hz)
        motion = makeup_ratio(colour_db) * vibration(hz, octaves=0.34, evenness=0.5)
        rustle_db = weights(RUSTLE_HZ, hz) @ rustle_levels
        # every crease has its own colour
        snap_colour = colour_scatter_db * rng.standard_normal(len(SNAPS))
        crinkle_colour = colour_scatter_db * rng.standard_normal(len(crinkle_s))
        snaps_db = (weights(SNAP_HZ, hz) @ levels + snap_colour)[:, None] + slip_db
        crinkles_db = crinkle_levels(hz, crinkle_s, size_db, settling, rustle_s, rustle_db) + crinkle_colour
        kicks = np.bincount(kick_at, makeup_ratio(2 * np.r_[snaps_db.ravel(), crinkles_db]), N + 1)[:N]
        power = np.abs(signal.oaconvolve(kicks, envelope)[:N])
        out += np.sqrt(power) * motion
        breaks = np.bincount(crack_at, crack_sign * makeup_ratio(snaps_db.mean(axis=1) + crack_db), N + 1)[:N]
        out += makeup_ratio(colour_db) * signal.oaconvolve(breaks, crack_ring(hz))[:N]
        # the motion one second off, so that sliding and snaps do not move together
        sliding += sliding_gain(hz, rustle_s, rustle_db, flutter) * np.roll(motion, SR)
    return out + folds(sliding)


# air in pouch and shelf niche: f/Hz, width/Hz, level added at resonance/dB
CAVITY = [(163.7, 68, -5), (470, 87, -7), (1197, 56, -7.5), (2260, 71, -12.5), (4020, 55, -9)]


def cavity(x):
    """Cavity resonance: a few fixed air modes colour the snaps and rustle of the pouch."""
    def modes(f):
        return 1 + sum(makeup_ratio(db) * 1j * f * w / (c * c - f * f + 1j * f * w) for c, w, db in CAVITY)
    return filtered(x, modes)


# hollow knocks of pouch and contents, and one bright ringing snap near 5.75 kHz:
# t/s, peak level/dB, settled pitch f/Hz
KNOCKS = [(1.952, -26.5, 1020), (2.072, -26, 655), (2.436, -30, 728), (2.463, -25, 1040), (2.76, -28, 340),
          (2.855, -24, 724), (3.003, -24, 443), (3.017, -28.5, 75), (3.068, -20.5, 347), (3.226, -40, 334),
          (3.622, -34, 500), (3.718, -25, 600), (4.299, -37.5, 700), (4.833, -30, 710), (5.234, -46, 456.4),
          (5.251, -21.5, 1330), (5.329, -39, 553), (5.493, -44.5, 519), (5.738, -17, 880),
          (5.785, -41, 1155), (5.835, -37, 345), (6.119, -28, 163), (6.161, -34.5, 650),
          (6.211, -38.5, 470), (6.367, -35.5, 488), (6.786, -31.5, 676), (6.9516, -21, 5750),
          (7.581, -40, 810), (7.703, -38.5, 452), (7.863, -26.5, 157), (7.868, -25.5, 470),
          (7.891, -33, 530), (8.139, -32, 498), (8.145, -35, 195), (8.209, -27, 441), (8.508, -42.5, 384),
          (8.647, -38.5, 175), (9.318, -33.5, 418), (9.36, -28, 294), (9.454, -34.5, 1060),
          (9.645, -41.5, 175), (9.682, -39, 1194)]


def knocks(cycles=16, rise_cycles=0.2, sag=0.012):
    """Damped oscillation: each one rings for a few cycles while its pitch sags slightly."""
    out, t = np.zeros(N + SR), np.arange(SR // 4) / SR
    for s, db, hz in KNOCKS:
        turns = hz * t
        shape = (1 - np.exp(-turns / rise_cycles)) ** 2 * makeup_ratio(-60 * turns / cycles)
        phase = 2 * np.pi * (turns + sag * 4 * (1 - np.exp(-turns / 4)) + rng.random())
        out[int(s * SR):][:len(t)] += makeup_ratio(db) * shape / shape.max() * np.sin(phase)
    return out[:N]


# smooth rubs of film, and faint thin whistles of unknown cause:
# t/s, length/s, level before the narrow-band colouring of folds()/dB, f/Hz, width/Hz
RUBS = [(2.942, .026, -27, 2500, 1600), (3.031, .028, -23, 3800, 1300), (3.3, .1, -46, 3900, 800),
        (3.3, .09, -48, 2750, 400), (4.54, .095, -47, 1350, 1300), (7.56, .06, -54, 2900, 1200),
        (4.54, .05, -59, 5800, 1200), (2.89, .05, -41, 10000, 1100), (2.94, .026, -37, 11000, 1300),
        (3.031, .028, -33, 10500, 1500), (3.588, .03, -46, 8800, 1500), (4.836, .1, -59, 4000, 3500),
        (5.153, .066, -52, 1900, 3200), (6.41, .085, -51, 3000, 2400), (6.955, .05, -57, 6000, 1800),
        (7.01, .18, -73, 2860, 110), (8.98, .31, -73, 4560, 240)]


def rubs(bluntness=0.65):
    """Band-limited noise: noise around one pitch swells and fades over the length of the rub or whistle."""
    out, t = np.zeros(N), np.arange(N) / SR
    for s, length, db, hz, width_hz in RUBS:
        band = filtered(rng.standard_normal(N), lambda f: 1 / (1 + (2 * (f - hz) / width_hz) ** 2))
        swell = np.abs(np.sin(np.pi * np.clip((t - s) / length, 0, 1))) ** bluntness
        out += makeup_ratio(db) * unit(band) * swell
    return out


# the pantry's answer: f/Hz, t60/s
SHELF = [(200, 0.17), (1500, 0.11), (6000, 0.15), (14000, 0.056)]


def shelf_echo(near):
    """Reverberation by convolution: the shelves answer 250 samples late."""
    return makeup_ratio(-18.5) * signal.fftconvolve(np.pad(near, (250, 0)), tail(SHELF, seconds=.4))[:N]


def scene():
    """Superposition: the pouch, its echo off the shelves, and the far sounds."""
    near = cavity(pouch()) + knocks() + folds(rubs())
    return (near + shelf_echo(near) + clatter() + floor() + hum())[None]


def low_pass(x):
    """Removes everything above the highest recorded frequency."""
    return signal.sosfilt(signal.butter(12, 17150, fs=SR, output="sos"), x)


TOP_HZ, TOP_ORDER = 15720, 300  # where and how steeply the band of the sound ends
FULL_SCALE = .96


def record(dry):
    """Band limitation: the microphone drops the deepest bass; the sound is bright just under its band limit."""
    def response(hz):
        bass_cut = (1j * hz / (45 + 1j * hz)) ** 2
        peak = 1 + makeup_ratio(1) / (1 + ((hz - 15300) / 1800) ** 2)
        top = makeup_ratio(-25.5) + 1 / np.sqrt(1 + (hz / TOP_HZ) ** TOP_ORDER)  # a little passes above the limit
        return bass_cut * peak * top
    band_limited = filtered(dry, response)
    # the loudest snaps round off
    mix = band_limited / (1 + np.abs(band_limited / FULL_SCALE) ** 6) ** (1 / 6)
    return low_pass(mix)


dry = scene()
out = record(dry)
store_pcm(out)
```